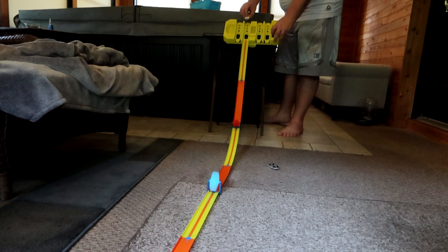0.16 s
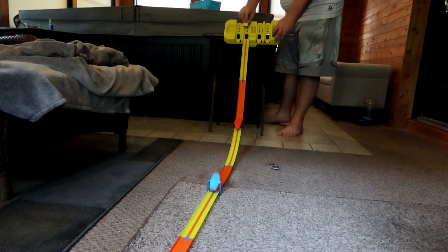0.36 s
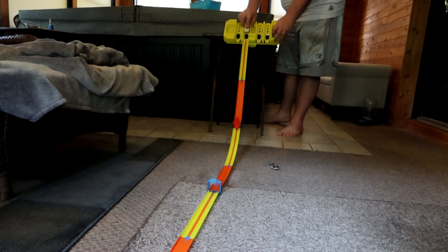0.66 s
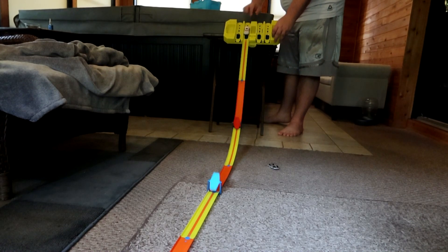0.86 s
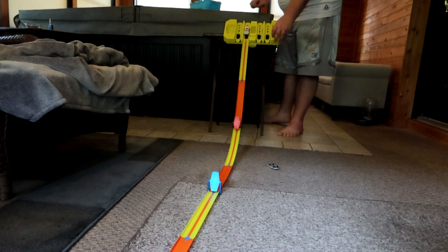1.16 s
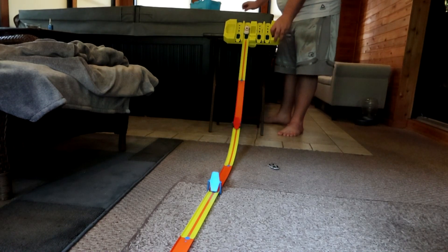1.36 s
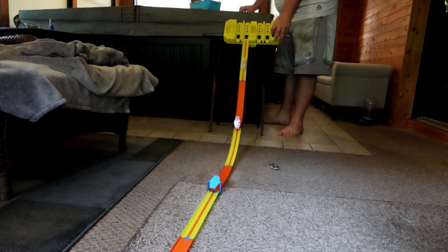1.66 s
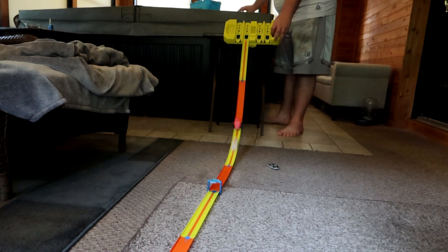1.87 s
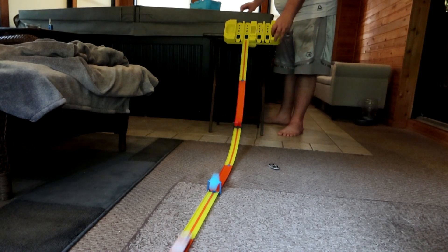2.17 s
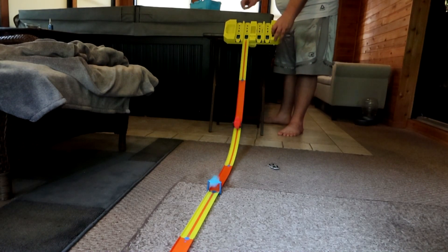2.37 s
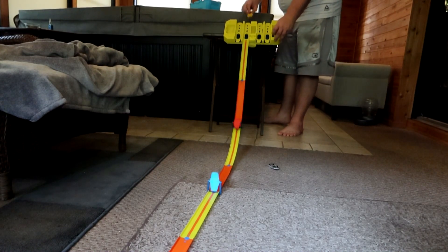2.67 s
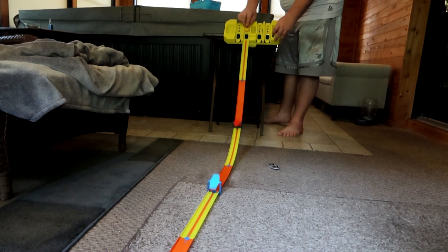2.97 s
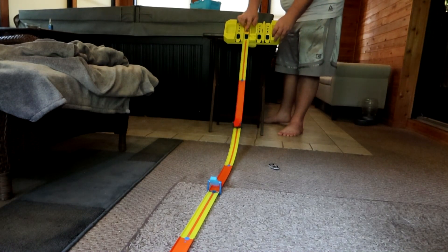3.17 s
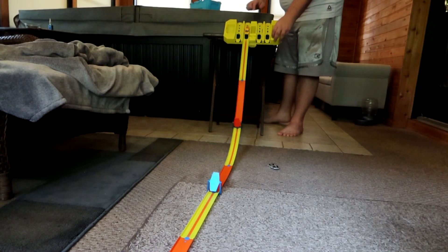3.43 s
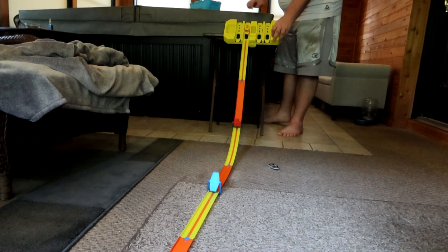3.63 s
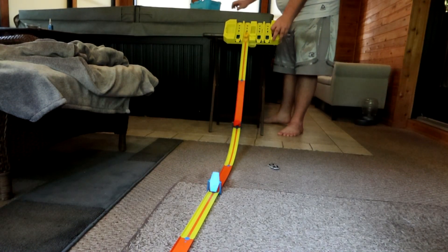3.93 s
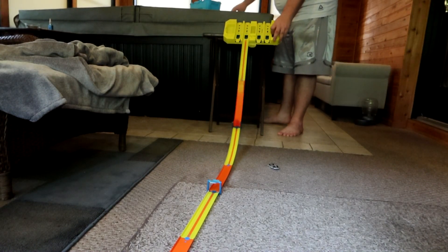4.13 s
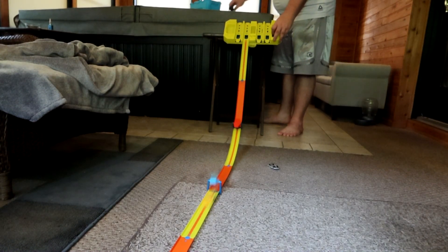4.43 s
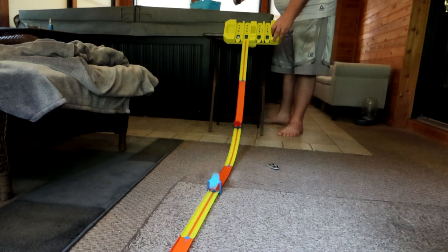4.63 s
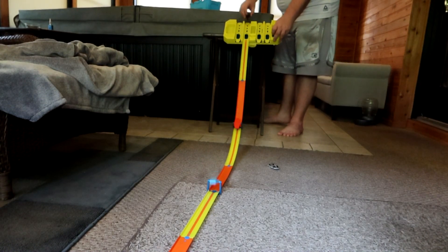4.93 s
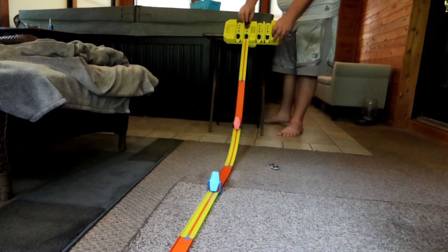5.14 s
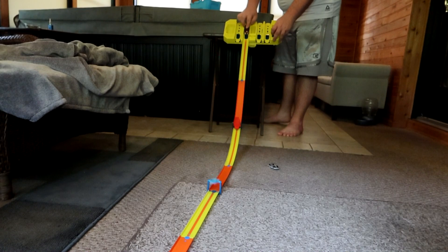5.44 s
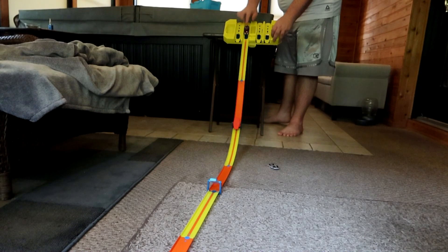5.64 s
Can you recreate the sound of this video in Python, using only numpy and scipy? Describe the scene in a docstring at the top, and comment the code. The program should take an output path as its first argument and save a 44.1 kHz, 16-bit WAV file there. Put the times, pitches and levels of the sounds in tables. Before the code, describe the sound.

Plastic lever snaps and light ticks set off little die-cast cars that whirr, rattle and clatter along a hollow plastic track indoors.

```python
"""Toy cars of die-cast metal roll one after another down a plastic track in a living room.
Random wheel ticks drum on the track, ring the axles and rattle the wheels, louder with speed.
Joints, obstacles and the launcher answer a car with bright clacks, soft contacts give dull knocks; the
hollow launcher sounds as a car is set in and as its lever is pressed and falls back. Each blow is a
chattering force through a modal body and a diffuse room. Air noise and a faint, wavering hum lie beneath."""
import sys
import numpy as np
from scipy import signal
from scipy.fft import rfft, irfft, next_fast_len
from scipy.io import wavfile

SR = 44100
rng = np.random.default_rng(int(sys.argv[2]) if len(sys.argv) > 2 else 0)


def master_out(mix):
    """Clip the mix to full scale and print it as 16-bit PCM to the path in sys.argv[1]."""
    frames = np.transpose(np.atleast_2d(mix))
    ceiling = np.clip(frames, -1, 1)
    pcm = np.round(ceiling * 32767).astype(np.int16)
    wavfile.write(sys.argv[1], SR, pcm)


N = 255780
BLOW = 2 ** 14   # samples in which a blow dies away

# Resonances of the hollow launcher, before each use scales their lift.
# Each row: frequency in Hz, width in Hz, lift in dB.
LAUNCHER_RESONANCES = [(704, 21, 11), (906, 8.4, 9), (973, 37, 5), (1200, 100, 3.5), (1260, 13, -8),
                       (1420, 50, -1.5), (1505, 69, 13), (1592, 120, 1.5), (1846, 49, 5.5),
                       (2236, 23, -1.5), (3160, 230, 1), (4730, 160, 9)]


def rolling_cars():
    """Superposition: the runs of the single cars add up."""
    # Each row: release in seconds, foot of the ramp in seconds, leaving the track in seconds, rest in seconds,
    # relative levels of track drumming, axle ring and wheel rattle in dB, limit to which the axle ring
    # sinks beyond the track in dB, axle frequency in Hz, axle width in Hz.
    runs = [(-0.6, -0.2, 0.072, 0.56, -35.5, -31.5, -26, -12, 3020, 1100),
            (1.491, 1.847, 2.3, 4.1, -34.5, -30, -30.5, -19, 2610, 860),
            (3.922, 4.226, 4.62, 5.12, -34, -28, -24, 0, 2380, 400)]
    return sum(rolling(*run) for run in runs)


def rolling(released_s, foot_s, off_s, rest_s, track_db, axle_db, wheel_db, off_axle_db,
            axle_hz, axle_width_hz, gain_db=-2.0):
    """Common excitation: the same ticks drive track, axles and wheels, each louder with speed."""
    # Resonance colour of the track. Each row: frequency in Hz, relative density in dB per Hz.
    track_colour = [(60, -22.5), (250, -10), (700, -7.5), (1200, -2), (1800, 3.5), (2300, 0.5),
                    (4000, -33.5), (15000, -62)]
    # Resonance colour of the wheels. Each row: frequency in Hz, relative density in dB per Hz.
    wheel_colour = [(500, -60), (1800, -12), (2800, -3.5), (4200, 0), (5200, -5), (7000, -13), (10000, -19),
                    (15000, -27.5)]
    # Resonances of the wheels. Each row: frequency in Hz, width in Hz, lift in dB.
    wheel_modes = [(3010, 290, 2.7), (3520, 470, 4), (3890, 420, 3.6), (4800, 260, 1.4), (6950, 320, 3.8)]
    # Rise in dB for ten times the speed, in the order track, axle, wheels.
    speed_rises = (21, 26.5, 29)
    run_off_db_per_s = 167   # how fast the noise sinks as the car leaves the track
    off_track_db, off_wheels_db = -9.5, -10.5   # limits to which drumming and rattle sink

    t, hz = np.arange(N) / SR, bins(BLOW)
    ticks = rms_one(wheel_ticks()) * (t <= rest_s)
    pace = np.log10(speed(t, released_s, foot_s))
    sinking_db = -run_off_db_per_s * np.maximum(t - off_s, 0)

    track = response_db(hz, track_colour)
    axle = -20 * np.log10(1 + (2 * (hz - axle_hz) / axle_width_hz) ** 2)
    wheel = response_db(hz, wheel_colour, wheel_modes)
    layers = ((track, track_db, off_track_db), (axle, axle_db, off_axle_db), (wheel, wheel_db, off_wheels_db))

    out = np.zeros((2, N))
    for (body_db, level_db, off_db), rise_db in zip(layers, speed_rises):
        run_off_db = np.maximum(sinking_db, off_db)
        force = ticks * from_db(gain_db + level_db + rise_db * pace + run_off_db)
        out += along_track(force, body_db, released_s, rest_s)
    return out


def wheel_ticks(ticks_per_s=900, spread_db=1.0, hop_db=3.0, hops_per_s=60):
    """Random impulses: hard wheels on loose axles tick on the track, in flurries as the car hops."""
    spread = spread_db * np.clip(rng.standard_normal(N), -2, 2)
    sizes = from_db(spread) * rng.choice([-1, 1], N)
    hops = np.interp(np.arange(N) / SR * hops_per_s, np.arange(2000), rng.standard_normal(2000))
    return sizes * from_db(hop_db * hops) * (rng.random(N) < ticks_per_s / SR)


def speed(t, released_s, foot_s, start_speed=0.3, ramp_power=3.5, friction_per_s=1.33):
    """Descent and friction: speed grows down the ramp, then decays exponentially (share of the top)."""
    descent = np.clip((t - released_s) / (foot_s - released_s), 0, 1) ** ramp_power
    on_ramp = start_speed + (1 - start_speed) * descent
    return on_ramp * np.exp(-friction_per_s * np.maximum(t - foot_s, 0))


def along_track(force, body_db, from_s, to_s, section_s=.11, depth_db=3.5, spacing_hz=170):
    """Moving point of excitation: every stretch of the way wakes a fresh mix of the upper modes."""
    out, hz = np.zeros((2, N + BLOW)), bins(BLOW)
    length = min(int(section_s * SR), BLOW // 2)
    first, last = int(max(from_s, 0) * SR), min(int(to_s * SR), N)
    for start in range(first, last, length):
        ticks = force[start:start + length]
        ring = causal(body_db + fine_modes(hz, depth_db, spacing_hz))
        heard = room(np.pad(ticks, (0, BLOW - len(ticks))))
        # unit power gain: the body sets the colour, not the level
        out[:, start:start + BLOW] += irfft(rfft(heard) * ring) / np.sqrt(np.mean(np.abs(ring) ** 2))
    return out[:, :N]


def car_clacks(ring_width_hz=620, gain_db=-1.9):
    """Hard impact: metal on plastic gives a bright crack and a short ring of the car's body."""
    # A car strikes joints, obstacles or the launcher it is set into. Each row: start in seconds,
    # relative level in dB, chatter length in seconds, treble shelf in dB, ring frequency in Hz,
    # ring lift in dB (none if negative).
    clacks = [(0.428, -34, 0.026, -11, 2000, 6), (0.499, -27.5, 0.025, -9, 1790, 8.5),
              (0.528, -23, 0.013, 4, 4530, 5.5), (0.781, -26, 0.0067, -16, 3110, 26),
              (1.846, -19, 0.015, 1, 3420, 7.5), (2.027, -12, 0.012, 4.5, 4050, 3),
              (2.036, -15.5, 0.005, 2, 4130, 7.5), (2.043, -19.5, 0.019, -13, 4100, 22),
              (2.348, -30.5, 0.025, -9.5, 2900, 6.5), (2.426, -29.5, 0.027, -9, 2660, 8),
              (2.498, -35.5, 0.0065, -21, 2040, 3), (2.707, -21, 0.0022, -10.5, 2150, 12),
              (2.785, -23.5, 0.03, -10, 2880, 2.5), (2.824, -26.5, 0.05, -17, 2200, -0.5),
              (4.245, -27.5, 0.054, 8, 4300, 8), (4.446, -18, 0.0036, 1, 2080, 20.5),
              (4.676, -32.5, 0.0051, 1.5, 2390, 23), (4.75, -31, 0.025, -6, 2470, 17.5),
              (5.049, -18, 0.022, -3.5, 2130, 14.5), (5.066, -24, 0.011, -9, 2420, 17)]
    # Colour of the struck parts. Each row: frequency in Hz, relative density in dB per Hz.
    clack_colour = [(60, -21), (170, 2.5), (650, 6), (1100, 0.5), (2000, 2.5), (4000, 3.5), (6000, -0.5),
                    (10000, -7.5), (15000, -14.5)]
    bass_db = -12   # the cars are too light to wake much bass

    out, hz = np.zeros((2, N)), bins(BLOW)
    for s, db, chatter_s, treble_db, ring_hz, ring_db in clacks:
        body = response_db(hz, clack_colour, [(ring_hz, ring_width_hz, max(ring_db, 0))])
        add(out, s, db + gain_db, chatter_s, body + shelves_db(hz, bass_db, treble_db))
    return out


def bumps(gain_db=2.5):
    """Modal excitation: soft, heavy contacts give dull knocks at the launcher, on the floor and nearby."""
    # Dull bumps. Each row: start in seconds, relative level in dB, chatter length in seconds, bass shelf in dB.
    thuds = [(0.134, -42, 0.12, -6.5), (0.458, -28.5, 0.0025, -8), (0.535, -20, 0.02, -1.5),
             (1.525, -30, 0.016, -9), (2.044, -32, 0.019, -8), (2.707, -23, 0.018, 6.5),
             (2.795, -45.5, 0.37, 2), (3.876, -40, 0.04, 3), (3.948, -34, 0.036, -6),
             (4.661, -42, 0.045, 0)]
    # Colour of the dull knocks. Each row: frequency in Hz, relative density in dB per Hz.
    bump_colour = [(50, -21), (110, -12.5), (190, -4.5), (400, -6), (700, -6), (950, -15), (1500, -23),
                   (4000, -30.5), (15000, -62)]
    # Low resonances. Each row: frequency in Hz, width in Hz, lift in dB.
    bump_modes = [(181.2, 9.5, 5.5), (330, 74, 4.4), (460, 70, 2.5), (617, 14, 2), (685, 67, 0.87)]

    out, hz = np.zeros((2, N)), bins(BLOW)
    body = response_db(hz, bump_colour, bump_modes)
    for s, db, chatter_s, bass_db in thuds:
        add(out, s, db + gain_db, chatter_s, body + shelves_db(hz, bass_db, 0, bass_hz=266))
    return out


def lever():
    """Repeated impact: the lever strikes the hollow launcher when pressed and when it falls back."""
    # The lever is pressed and lets a car go.
    # Each row: start in seconds, relative level in dB, base chatter in seconds, base bass shelf in dB.
    presses = [(1.438, -15, 0.051, 1), (3.806, -14, 0.078, -1)]
    # A touch, the stop and a rebound. Each row: delay in seconds, level change in dB,
    # share of the chatter, bass change in dB, treble shelf in dB.
    press_contacts = [(-0.009, -14.5, 0.86, 3, -6), (0, 0.5, 0.58, -1.5, -3.5), (0.045, -4.5, 0.8, 1, -5.5)]
    # The lever falls back.
    # Each row: start in seconds, relative level in dB, base chatter in seconds, base bass shelf in dB.
    falls = [(0.288, -19, 0.024, 5), (2.585, -18, 0.026, 3.5), (4.856, -18.5, 0.018, 6)]
    # A touch, a bright snap and a dull knock. Each row: delay in seconds, level change in dB,
    # share of the chatter, bass change in dB, treble shelf in dB.
    fall_contacts = [(-0.018, -14.5, 1, -10, -4), (0, -3, 1, 1.5, 14), (0.005, 2.5, 0.92, -1, -18)]
    # Colour of the struck lever. Each row: frequency in Hz, relative density in dB per Hz.
    lever_colour = [(50, -18), (130, -12.5), (480, -10), (720, -5), (1350, 3.5), (2100, -2.5), (3500, -6),
                    (6000, -13.5), (10000, -25), (15000, -35.5)]
    strokes = contacts(presses, press_contacts) + contacts(falls, fall_contacts)
    return launcher(strokes, lever_colour, mode_share=0.63, gain_db=-0.12, give_s=0.0019)


def loading():
    """Paired impact: a car set into the launcher and nudged ticks on the plastic, then settles."""
    # The car is set in and nudged.
    # Each row: start in seconds, relative level in dB, chatter length in seconds, base bass shelf in dB.
    nudges = [(0.78, -26, 0.032, -10), (0.848, -33.5, 0.049, -5.5), (1.375, -44.5, 0.014, -3),
              (2.938, -21, 0.054, -4.5), (3.094, -42, 0.062, -2), (3.132, -30.5, 0.034, -4.5),
              (5.2, -31.5, 0.09, -0.5), (5.478, -32.5, 0.018, -3.5)]
    # A tick, then the settling. Each row: delay in seconds, level change in dB,
    # share of the chatter, bass change in dB, treble shelf in dB.
    nudge_contacts = [(0, -1, 1, -2.9, 3.5), (0.01, -3, 1, -0.082, -11)]
    # Colour of the touched plastic. Each row: frequency in Hz, relative density in dB per Hz.
    loading_colour = [(50, -2), (150, 0.5), (450, 2.5), (800, 2.5), (1700, 0), (3300, -3.5), (6000, -14.5),
                      (10000, -21.5), (15000, -35.5)]
    touches = contacts(nudges, nudge_contacts)
    return launcher(touches, loading_colour, mode_share=0.58, gain_db=0.43, give_s=0.00045)


def contacts(moves, pattern):
    """Fixed contact sequence: every move repeats the same pattern at its own time and strength."""
    return [(s + delay_s, db + step_db, chatter_s * share, bass_db + weight_db, treble_db)
            for s, db, chatter_s, bass_db in moves
            for delay_s, step_db, share, weight_db, treble_db in pattern]


def launcher(blows, colour, mode_share, gain_db, give_s):
    """Cavity and shell resonance: blows wake the modes of the hollow plastic starting gate."""
    out, hz = np.zeros((2, N)), bins(BLOW)
    modes = [(f, width, mode_share * lift) for f, width, lift in LAUNCHER_RESONANCES]
    body = response_db(hz, colour, modes)
    for s, db, chatter_s, bass_db, treble_db in blows:
        add(out, s, db + gain_db, chatter_s, body + shelves_db(hz, bass_db, treble_db), give_s)
    return out


def room_tone(hum_db=-2.5, waver_hz=1.69, air_db=-44):
    """Stationary noise and modulated tones: soft air and an appliance's wavering hum; mid and side."""
    # Colour of the air noise. Each row: frequency in Hz, relative density in dB per Hz.
    air = [(12, -35.5), (20, -13.5), (65, 1.5), (154, -8), (204, -12.5), (255, -5), (285, -11.5),
           (434, -9.5), (472, -15), (590, -14.5), (642, -15.5), (849, -11.5), (1190, -17), (2600, -28),
           (6720, -37.5), (16000, -53.5)]
    # Partials of the hum. Each row: mean frequency in Hz, relative level in dB.
    hum = [(53.8, -55), (253.0, -63), (586.8, -54), (861.3, -76)]
    t = np.arange(N) / SR
    out = from_db(air_db) * rms_one(coloured(rng.standard_normal((2, N)), air))
    knots = np.linspace(0, t[-1], 30)
    for hz, db in hum:
        pitch = hz + waver_hz * np.interp(t, knots, rng.standard_normal(len(knots)))
        phase = 2 * np.pi * np.cumsum(pitch) / SR
        out[0] += np.sqrt(2) * from_db(db + hum_db) * np.sin(phase)
    return out


def add(out, s, level_db, chatter_s, body_db, give_s=0, attack_s=0.034, snap_db=4.0, snap_hz=7000):
    """Source and filter: chatter passes through room and body; the level is that of the attack."""
    heard = room(chatter(max(chatter_s, .001), give_s))
    # the very first touch is hard: its highest treble arrives as one sharp snap
    highpass = signal.butter(2, snap_hz, "high", fs=SR)
    heard += from_db(snap_db) * signal.lfilter(*highpass, signal.unit_impulse(BLOW))
    blow = irfft(rfft(heard) * causal(body_db + fine_modes(bins(BLOW))))
    blow *= np.minimum(1, np.linspace(10, 0, BLOW))   # the end of the tail fades out
    attack = blow[0, :int(attack_s * SR)]
    gain = from_db(level_db) / np.sqrt(np.mean(attack ** 2))
    start = int(s * SR)
    out[:, start:start + BLOW] += gain * blow[:, :N - start]


def chatter(length_s, give_s, contacts_per_s=2000, spread_db=3.5, rebound_db=8.0, full_s=0.0086):
    """Contact mechanics: a first contact, then dying rebounds; yielding plastic loads gradually."""
    t = np.arange(BLOW) / SR
    sizes = from_db(spread_db * rng.standard_normal(BLOW)) * rng.choice([-1, 1], BLOW)
    decay = from_db(-20 * t / length_s)   # 20 dB down after the chatter length
    rebounds = sizes * (rng.random(BLOW) < contacts_per_s / SR) * decay
    # longer chatter carries more energy
    force = from_db(rebound_db) * np.sqrt(length_s / full_s / BLOW) * rms_one(rebounds)
    force[0] += 1
    return force * (1 - np.exp(-(t + 0.002) / max(give_s, 1e-5)))


def room(force, direct_db=0.0, early_db=-2.5, early_s=.024, split_hz=500, count=14):
    """Room acoustics: direct sound, early reflections and a diffuse decaying tail; mid and side."""
    bass_t60_s, treble_t60_s = 0.28, 0.29
    size, reach = len(force), int(early_s * SR)
    taps = np.zeros(reach)
    taps[rng.integers(1, reach, count)] = rng.choice([-1, 1], count) / np.sqrt(count)
    reflections = signal.oaconvolve(force, taps)[:size]
    near = from_db(direct_db) * force + from_db(early_db) * reflections

    # the room stores the energy it is fed and lets it go as noise
    out = np.zeros((2, size))
    for band, t60 in (("low", bass_t60_s), ("high", treble_t60_s)):
        keep = np.exp(-2 * np.log(1000) / (t60 * SR))   # share of energy kept per sample
        stored = signal.lfilter([1 - keep], [1, -keep], force ** 2)
        band_filter = signal.butter(1, split_hz, band, fs=SR)
        out += np.sqrt(stored) * signal.lfilter(*band_filter, rng.standard_normal((2, size)))
    out[0] += near
    return out


def fine_modes(hz, depth_db=0.5, spacing_hz=110, from_hz=600):
    """Modal density: each spot of contact wakes its own mix of the dense upper modes; in dB."""
    strengths = np.clip(rng.standard_normal(1000), -2, 2)
    mix = np.interp(hz / spacing_hz, np.arange(len(strengths)), strengths)
    return depth_db * hz / (hz + from_hz) * mix


def shelves_db(hz, bass_db, treble_db, bass_hz=750, treble_hz=4600):
    """Impact spectrum: heavy blows have more bass, hard ones more treble."""
    return bass_db / (1 + (hz / bass_hz) ** 4) + treble_db / (1 + (treble_hz / hz) ** 4)


def response_db(hz, colour, modes=()):
    """Modal response: a broad colour with resonances standing on it."""
    at, db = np.transpose(colour)
    broad = np.interp(np.log(hz), np.log(at), db)
    return broad + sum(lift / (1 + (2 * (hz - f) / width) ** 2) for f, width, lift in modes)


def causal(db):
    """Minimum phase: the folded cepstrum makes a dB response ring only after the blow."""
    cepstrum = irfft(np.log(from_db(db)))
    half = len(cepstrum) // 2
    cepstrum[1:half] *= 2
    cepstrum[half + 1:] = 0
    return np.exp(rfft(cepstrum))


def coloured(x, colour):
    """Linear filtering: give a long signal a colour by multiplying spectra."""
    size = 2 * next_fast_len(N // 2 + BLOW)
    return irfft(rfft(x, size) * causal(response_db(bins(size), colour)))[..., :N]


def bins(size):
    """Discrete spectrum: its frequencies in Hz, at least 1."""
    return np.maximum(np.arange(size // 2 + 1) * SR / size, 1)


def rms_one(x):
    """Power normalisation: scale to unit mean square."""
    return x / np.sqrt(np.mean(x ** 2) + 1e-20)


def from_db(db):
    """Logarithmic level: decibels to amplitude gain."""
    return 10 ** (np.asarray(db) / 20)


def stereo(mid, side):
    """Sum and difference: left and right from mid and side."""
    return np.array([mid + side, mid - side])


def scene():
    """Superposition of cars, launcher and room at two close microphones, which differ by frequency."""
    # Stereo width of the cars and blows. Each row: frequency in Hz, side minus mid in dB.
    width = [(60, -24.5), (250, -17), (600, -19.5), (1400, -22), (2800, -10.5), (5500, -3), (9000, 2),
             (14000, 6.5)]
    # Stereo width of the room tone, from all sides. Each row: frequency in Hz, side minus mid in dB.
    air_width = [(60, -30), (130, -11), (250, -6), (500, -5.5), (1000, -11), (2000, -5), (4000, -4),
                 (14000, -5.5)]
    mid, side = rolling_cars() + car_clacks() + bumps() + lever() + loading()
    air_mid, air_side = room_tone()
    return stereo(mid + air_mid, coloured(side, width) + coloured(air_side, air_width))


def record(dry):
    """Saturation and band limiting: the highest peaks are rounded, the top is cut."""
    cutoff_hz = 15900
    rounded = 1.1 * np.tanh(dry / 1.1)
    return signal.sosfilt(signal.ellip(10, .2, 80, cutoff_hz, fs=SR, output="sos"), rounded)


dry = scene()
out = record(dry)
master_out(out)
```